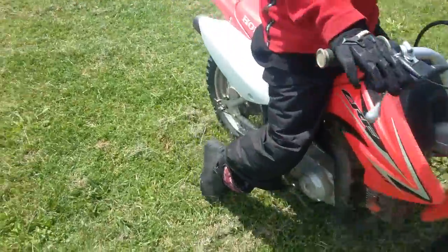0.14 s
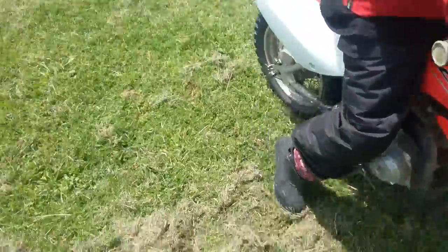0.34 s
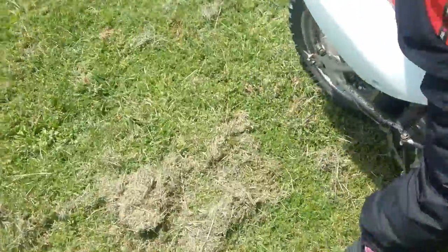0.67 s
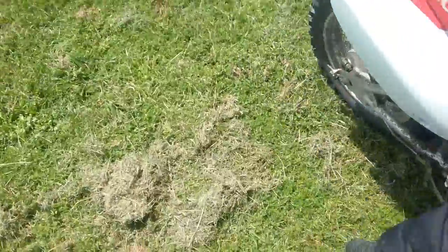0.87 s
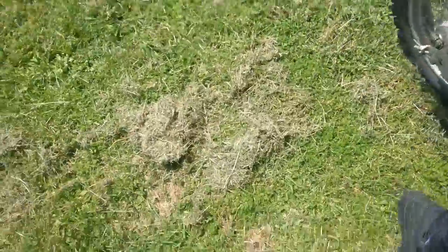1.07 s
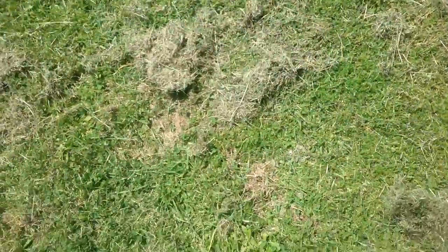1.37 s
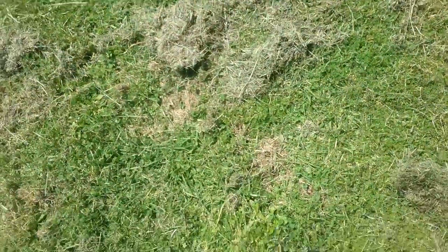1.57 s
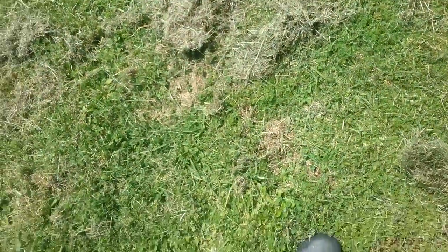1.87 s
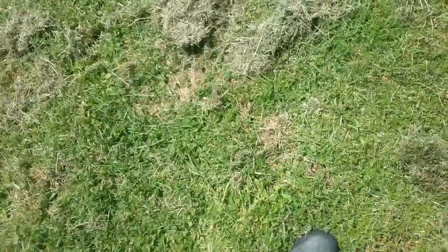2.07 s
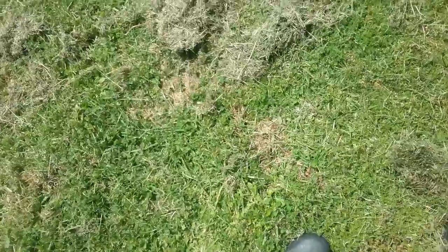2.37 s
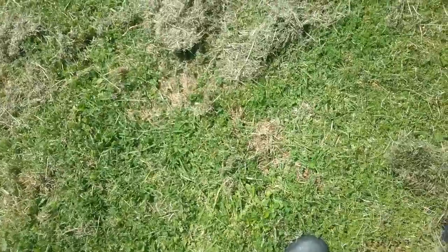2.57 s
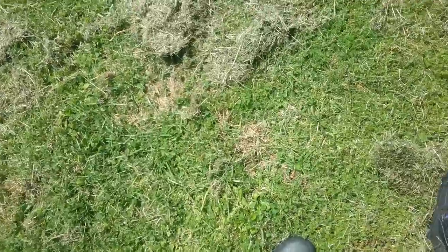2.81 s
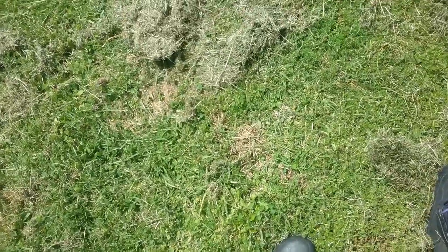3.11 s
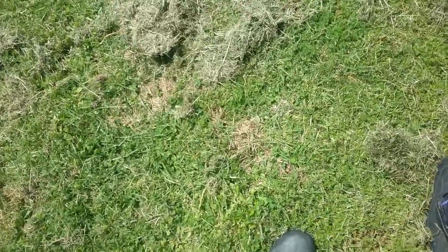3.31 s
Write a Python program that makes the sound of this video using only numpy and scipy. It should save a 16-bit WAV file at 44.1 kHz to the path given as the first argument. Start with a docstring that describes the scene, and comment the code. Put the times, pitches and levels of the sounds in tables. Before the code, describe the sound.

A small dirt bike idles close by on open grass, about thirteen hollow putts a second, with occasional weak beats, fine mechanical ticking and light wind rumble on a handheld microphone.

```python
"""Uneven putts of a small single-cylinder dirt bike idling close by on an open field, about 13 a second.
The first few firings are weak, and later one is weak or missed now and then, often with a hollow boom.
Each cycle is an exhaust pulse ringing the silencer, then an intake gulp ringing the airbox.
Valve ticks and a grainy mechanical hiss lie over them; the top treble fades as the microphone turns away.
A light wind, shaped noise with short pressure pushes, rumbles and thumps on the microphone."""
import sys
import numpy as np
from scipy import signal
from scipy.fft import rfft, irfft, next_fast_len
from scipy.io import wavfile
from scipy.ndimage import uniform_filter1d, minimum_filter1d, map_coordinates

SR = 44100
rng = np.random.default_rng(int(sys.argv[2]) if len(sys.argv) > 2 else 0)


def file_out(sig):
    """Save sig as 16-bit WAV at sys.argv[1]."""
    # one column per channel
    cols = np.atleast_2d(sig).T
    # limit, then scale
    lim = np.clip(cols, -1, 1)
    pcm = np.round(lim * 32767).astype(np.int16)
    wavfile.write(sys.argv[1], SR, pcm)


N = 152145  # length in samples

# colour of the sharp gas noise, for the crack and the metal shell: pitch_hz, relative level_db
CRACK_COLOUR = [(200, 23), (500, 11), (950, 16), (1300, -30), (1750, 8), (2500, 12), (3000, -34),
                (3700, -8), (4200, 2), (4700, 0.5), (5500, 3), (7000, -22), (9500, -21.5), (11500, -12),
                (16000, -19)]
# colour of the valve ticks and the gas puffs: pitch_hz, relative level_db
TICK_COLOUR = [(1000, 9), (3500, -8.5), (5200, 17), (6300, -2), (7500, -10.5), (16000, -8)]

CYCLE_SCATTER_DB, RASP_SCATTER_DB = .35, 1  # random spread per cycle of the pulses and of their rasp


def amp(db):
    """Decibels to a linear factor."""
    return 10 ** (np.asarray(db) / 20)


def unit(x):
    """x scaled to rms 1."""
    return x / np.sqrt(np.mean(x ** 2) + 1e-20)


def curve(rows):
    """One value per sample, on straight lines between (time_s, value) points."""
    return np.interp(np.arange(N) / SR, *np.transpose(rows))


def wobble(rate):
    """A smooth random curve with rate knots a second."""
    knots = rng.standard_normal(SR // 16)
    return map_coordinates(knots, [np.arange(N) * rate / SR], mode="wrap")


def filtered(x, response):
    """x through a filter given as a function of frequency in Hz."""
    size = next_fast_len(N + SR // 2)
    spectrum = rfft(x, size) * response(np.fft.rfftfreq(size, 1 / SR))
    return irfft(spectrum, size)[:N]


def noise(colour):
    """Noise of rms 1 whose spectrum follows the colour's points on a log frequency axis."""
    hz, db = np.transpose(colour)
    white = rng.standard_normal(N)
    return unit(filtered(white, lambda f: amp(np.interp(np.log(f + 1), np.log(hz), db))))


def ring(x, modes, low_hz=70, alternate=True):
    """x, rounded like a pulse of gas, through resonances that radiate little below low_hz."""
    pulse_hz = 2660  # a pulse of gas holds little above this

    def response(f):
        body = 0
        for k, (centre, width, db) in enumerate(modes):
            sign = (-1) ** ((k + 1) * alternate)  # neighbouring modes push in opposite directions
            body = body + sign * amp(db) * 1j * f * width / (centre ** 2 - f * f + 1j * f * width)
        soft = 1 / (1 - (f / pulse_hz) ** 2 + 1j * np.sqrt(2) * f / pulse_hz)
        radiation = f * f / (f * f - low_hz ** 2 - 1j * np.sqrt(2) * f * low_hz)
        return body * soft * radiation

    return filtered(x, response)


def pulses(times, db):
    """One single-sample impulse at each time; those past the end are dropped."""
    places = np.clip(np.round(times * SR), 0, N).astype(int)
    return np.bincount(places, amp(db) * np.ones(len(times)), N + 1)[:N]


def bursts(times, db, attack_s, t60):
    """An envelope that jumps up at each time and dies away by 60 dB in about t60 seconds."""
    t = np.arange(SR // 4) / SR
    shape = (1 - np.exp(-t / attack_s)) * np.exp(-np.log(1000) * t / t60)
    return signal.fftconvolve(pulses(times, db), shape / shape.max())[:N]


def wind():
    """A lumpy rumble on the microphone; each thump is one pressure push inside a short eddy of noise."""
    # strength of the rumble: time_s, level_db
    strength = [(0, -28), (.45, -25.5), (.9, -29), (1.25, -24), (1.55, -22), (1.95, -31), (2.2, -22.5),
                (2.36, -17.5), (2.45, -25.5), (2.55, -15), (2.68, -32), (3.45, -33)]
    # colours of the rumble and of the eddies: pitch_hz, relative level_db
    rumble_colour = [(20, -35.5), (35, -53), (55, -3), (85, -1.5), (120, 0.5), (200, -5.5), (400, -13),
                     (800, -28.5), (2000, -66.5)]
    eddy_colour = [(25, -76), (70, 9), (250, 20.5), (550, 1), (1000, -15), (1600, -23.5), (3000, -54),
                   (8000, -85.5)]
    # thumps on the microphone: start_s (centre of the push), push_db, pitch_hz, eddy_db, eddy_length_s
    thumps = [(0.4308, -2.5, 117, -21.5, 0.024), (1.398, -9.5, 382, -11.5, 0.0069),
              (1.53, -8, 300, -18, 0.0054), (1.541, -12, 450, -12, 0.008), (1.774, -6, 496, -11.5, 0.01),
              (1.7887, -5, 685, -5, 0.002), (2.134, -14, 635, -10.5, 0.0018), (2.171, -3, 460, 7, 0.0013),
              (2.202, -12, 450, -33, 0.0068), (2.212, -13.5, 620, -19, 0.01),
              (2.315, -4.5, 363, -19, 0.0079), (2.322, -15.5, 400, -20, 0.0017),
              (2.335, -6, 503, -11, 0.0045), (2.343, -17, 223, -8.5, 0.011), (2.376, 3.5, 200, -17, 0.0082),
              (2.528, -11.5, 440, -23, 0.0042), (2.543, -6, 250, -18, 0.018)]
    swing_db, swing_rate = 2.2, 28.01  # lumpiness of the rumble, knots per s

    t = np.arange(N) / SR
    out = amp(curve(strength) + swing_db * wobble(swing_rate)) * noise(rumble_colour)
    eddies = noise(eddy_colour)
    for start_s, push_db, pitch_hz, eddy_db, length_s in thumps:
        u = (np.pi * pitch_hz * (t - start_s)) ** 2
        push = (1 - 2 * u) * np.exp(-u)  # one swell with a dip on either side
        swirl = np.exp(-((t - start_s) / length_s) ** 2) * eddies
        out = out + amp(push_db) * push + amp(eddy_db) * swirl
    return out


def cycles():
    """The turning engine: each cycle's time, loudness, and exhaust, intake and boom levels of a misfire."""
    # idle speed: time_s, cycles_per_s
    speed = [(0.0, 13.831), (0.95, 13.855), (1.12, 13.333), (1.22, 13.28), (1.35, 13.678), (1.5, 13.271),
             (1.68, 13.567), (1.9, 12.673), (2.05, 13.383), (2.2, 13.322), (2.55, 13.192), (2.75, 12.875),
             (2.97, 13.587), (3.12, 13.705), (3.24, 12.905), (3.45, 12.992)]
    # loudness of the pulses: time_s, level_db
    loudness = [(0, -3.5), (.46, -2), (.8, 0.5), (1.04, 0.9), (1.13, 2.5), (1.5, 2.8), (2.0, 4),
                (2.25, 2.3), (2.5, .3), (2.8, -1), (3.05, -1), (3.45, -1)]
    # weak or missed firings: start_s (nearest cycle), exhaust_change_db, intake_change_db, boom_db
    misfires = [(.03, -9.5, -18.5, 3.5), (.103, -5.5, -4.5, 6.5), (.175, -4, -6.5, 3),
                (.247, -7.5, -11.5, 3), (.319, -2.5, -5, 0), (.392, -11.5, -4.5, -19),
                (1.713, -10.5, -1, 6.5), (1.864, -11, -4, 6.5), (2.32, -5.5, -2, -6), (2.547, -16, -2, -18),
                (2.699, -13, -3.5, -34), (3.224, -7, -2, 7)]
    first_s = .030  # first firing

    turns = np.cumsum(curve(speed)) / SR
    turns -= np.interp(first_s, np.arange(N) / SR, turns)
    times = np.searchsorted(turns, np.arange(int(turns[-1]) + 1)) / SR
    change = np.tile([0., 0., -np.inf], (len(times), 1))  # a healthy firing has no boom
    for start_s, *row in misfires:
        change[np.argmin(abs(times - start_s))] = row
    return times, np.interp(times, *np.transpose(loudness)), *change.T


def valve_gear(times):
    """Light ticks scattered around set delays after each firing, over the grainy hiss of chain and gears."""
    # valve ticks: delay_s after the exhaust pulse, level_db relative to tick_db
    tick_rows = [(.034, 0.5), (.049, -2), (.064, -9.5)]
    # colours of the hiss and of the top treble: pitch_hz, relative level_db
    hiss_colour = [(300, -5.5), (900, 6.5), (1400, 3), (1800, 4), (2600, 2), (3400, -5), (4500, -4),
                   (5500, 0.5), (6300, -4.5), (7400, -18), (10000, -21), (16000, -33.5)]
    sizzle_colour = [(2000, -32), (6000, 11), (8000, 7), (10000, 3), (12500, 8), (16000, 1)]
    # course of the hiss, before hiss_db: time_s, level_db
    hiss_course = [(0.0, -42), (0.36, -40), (0.82, -44.5), (1.52, -43), (2.14, -45.5), (2.59, -50),
                   (3.45, -51.5)]
    # top treble, fading as the microphone turns away: time_s, level_db
    sizzle_course = [(0, -56), (.6, -56.5), (1.3, -60.5), (1.8, -69), (2.4, -80), (3.45, -70)]
    tick_db, hiss_db = -48, -2.5
    late_s, uneven_db = 0.0083, 2  # random spread of the ticks
    grain_db, grain_rate = 3, 240  # coarseness of the hiss, knots per s

    chance = rng.standard_normal((len(times), len(tick_rows), 2))
    ticks = 0
    for k, (delay_s, db) in enumerate(tick_rows):
        tick_times = times + delay_s + late_s * chance[:, k, 0]
        levels = tick_db + db + uneven_db * chance[:, k, 1]
        ticks = ticks + bursts(tick_times, levels, attack_s=0.00049, t60=0.015)
    hiss = amp(hiss_db + curve(hiss_course)) * noise(hiss_colour)
    sizzle = amp(curve(sizzle_course)) * noise(sizzle_colour)
    return ticks * noise(TICK_COLOUR) + amp(grain_db * wobble(grain_rate)) * (hiss + sizzle)


def intake(times, db, change_db):
    """The gulp of air rings the airbox and its inlet, with a rasp of suction and a knock in the casing."""
    # resonances of the airbox, the air inlet (heard mostly from in front of the bike) and the casing:
    # pitch_hz, width_hz, level_db
    airbox = [(115, 11.8, 40), (264.5, 20, 41), (384.4, 13.2, 37), (616.4, 15, 17), (836, 19, 19.5),
              (1113, 17, 3)]
    snorkel = [(393, 9, 0.5), (466, 78, -18), (906, 65, -26), (980, 73, -21)]
    casing_modes = [(1661, 23, 7), (1752, 49, 7), (1900, 34, -15), (2110, 48, -12), (2320, 82, -3.5),
                    (2480, 92, -7.5), (3720, 12, -12)]
    # strike on the inlet: time_s, level_db
    snorkel_course = [(0, 33), (.35, 33.5), (.7, 11), (1.2, 6), (3.45, 6.5)]
    # strike on the casing, which also steers the suction: time_s, level_db
    casing_course = [(0, -9.5), (.5, 6), (1.0, 7), (2.0, 7), (2.6, 5), (3.45, 1)]
    # colour of the suction: pitch_hz, relative level_db
    suck_colour = [(300, 58), (900, 23), (1400, 14.5), (2200, -18), (3200, 1.5), (5400, -2.5), (7500, -9),
                   (16000, -13.5)]
    gulp_lag_s, clatter_lag_s = .0181, .023  # both after the exhaust pulse
    suck_db = -35.5
    clatter_share = .3  # share of a misfire's change that knock and suction follow

    size, rasp = rng.standard_normal((len(times), 2)).T
    gulp_times, clatter_times = times + gulp_lag_s, times + clatter_lag_s
    gulp = ring(pulses(gulp_times, db + change_db + CYCLE_SCATTER_DB * size), airbox)
    inlet = ring(pulses(gulp_times, np.interp(times, *np.transpose(snorkel_course))), snorkel)
    rasp_db = np.interp(times, *np.transpose(casing_course))
    rasp_db = rasp_db + clatter_share * change_db + RASP_SCATTER_DB * rasp
    casing = ring(pulses(clatter_times, rasp_db), casing_modes, alternate=False)
    suction = bursts(clatter_times, suck_db + rasp_db, attack_s=0.0016, t60=0.1) * noise(suck_colour)
    return gulp + inlet + casing + suction


def shell(x):
    """The dense, short ring of the silencer's thin metal: one decaying noise, the same at every blow."""
    t60 = 0.11  # seconds
    t = np.arange(SR // 10) / SR
    metal = noise(CRACK_COLOUR)[:len(t)] * np.exp(-np.log(1000) * t / t60)
    return signal.fftconvolve(x, metal)[:N]


def exhaust(times, db, change_db, boom_db):
    """Each firing rings the silencer and its shell with a crack of gas; a misfire adds a hollow boom."""
    # resonances of the silencer and of the hollow boom: pitch_hz, width_hz, level_db
    silencer = [(96, 12.5, 37.5), (255, 31.14, 42), (340, 33.9, 39.5), (390, 53, 22), (774, 100, -3),
                (1042, 150, 5)]
    boom_modes = [(107.2, 8.2, 43.8), (147, 99, 19.9)]
    # sharp puffs of gas: start_s, level_db
    chuffs = [(1.118, -45), (3.224, -39.5)]
    gas_db, shell_db = -46, -33.5
    crack_share = 0.5  # share of a misfire's change that crack and shell follow

    size, rasp = rng.standard_normal((len(times), 2)).T
    putt = ring(pulses(times, db + change_db + CYCLE_SCATTER_DB * size), silencer)
    boom = ring(-pulses(times, db + boom_db), boom_modes)
    crack_db = db + crack_share * change_db + RASP_SCATTER_DB * rasp
    crack = bursts(times, gas_db + crack_db, attack_s=0.00041, t60=0.079) * noise(CRACK_COLOUR)
    metal = shell(pulses(times, shell_db + crack_db))
    chuff = bursts(*np.transpose(chuffs), attack_s=0.0028, t60=0.088) * noise(TICK_COLOUR)
    return putt + boom + crack + metal + chuff


def scene():
    """Wind, valve gear, intake and exhaust together, the last three driven by the same engine cycles."""
    times, db, exhaust_db, intake_db, boom_db = cycles()
    engine = valve_gear(times) + intake(times, db, intake_db) + exhaust(times, db, exhaust_db, boom_db)
    return (wind() + engine)[None]


def record(dry):
    """The microphone drops the deepest bass, a fast limiter holds the peaks, and the top is cut off."""
    low_hz, top_hz = 42, 16000
    ceiling, window = .94, 260  # peak level; limiter window in samples
    x = filtered(dry[0], lambda hz: hz ** 4 / np.hypot(hz ** 4, low_hz ** 4))
    need = np.minimum(1, ceiling / (abs(x) + 1e-9))
    gain = uniform_filter1d(minimum_filter1d(need, size=window), size=window)
    return filtered(x * gain, lambda hz: hz < top_hz)[None]


dry = scene()
out = record(dry)
file_out(out)
```